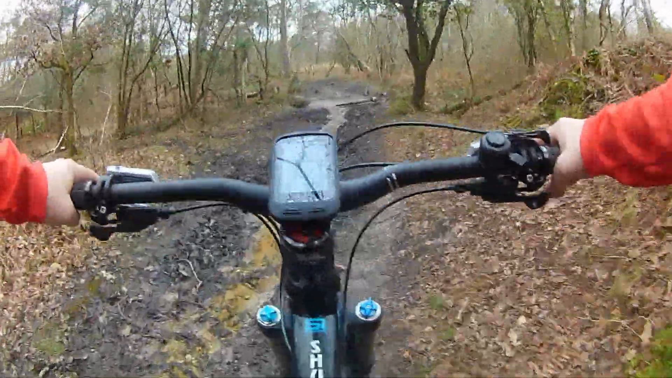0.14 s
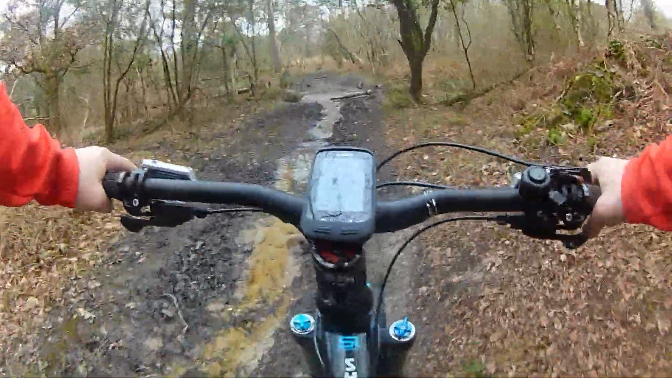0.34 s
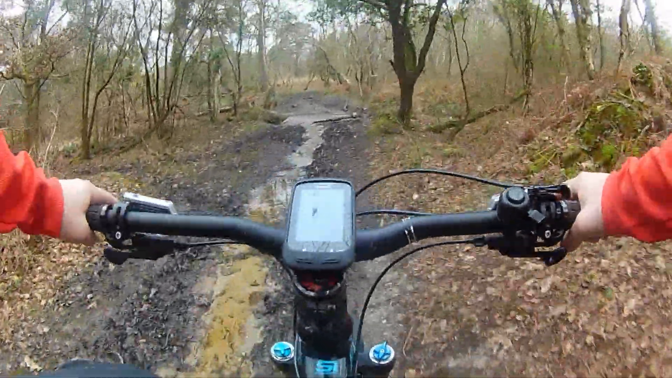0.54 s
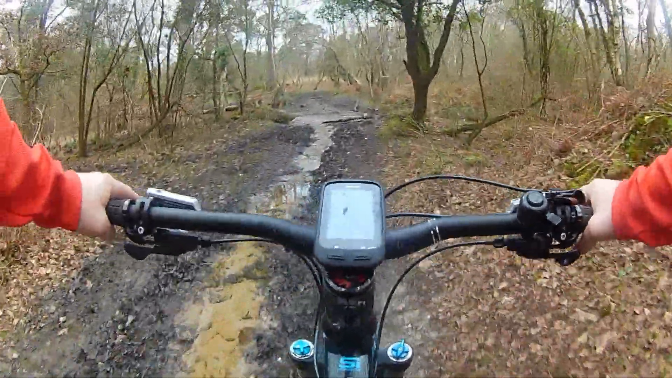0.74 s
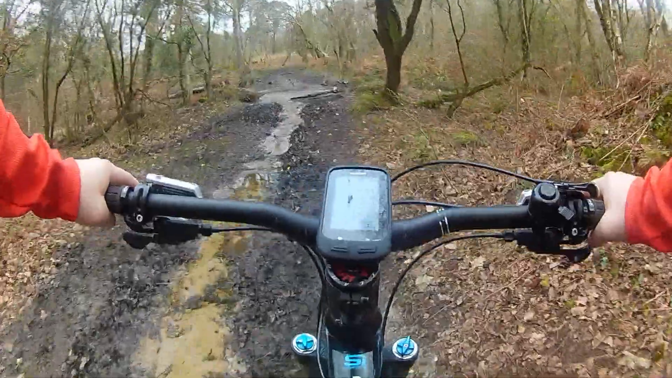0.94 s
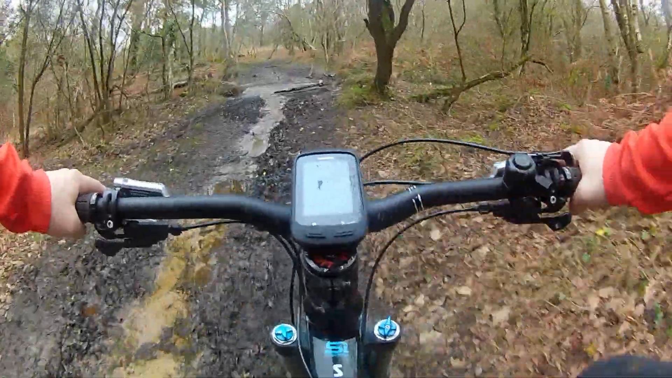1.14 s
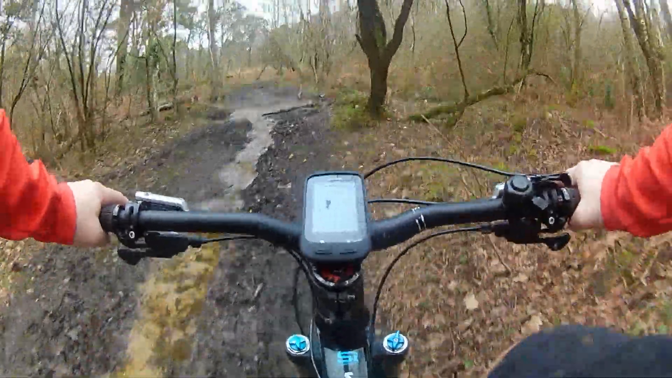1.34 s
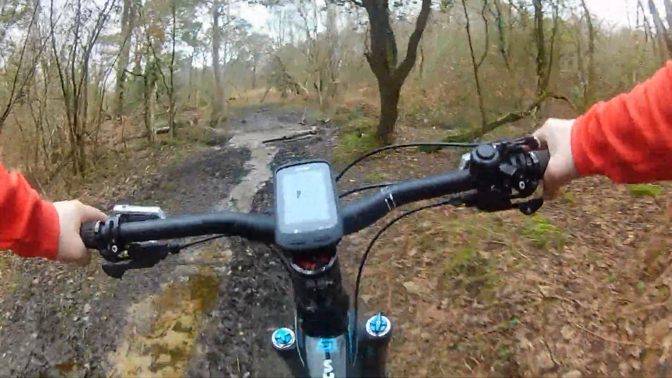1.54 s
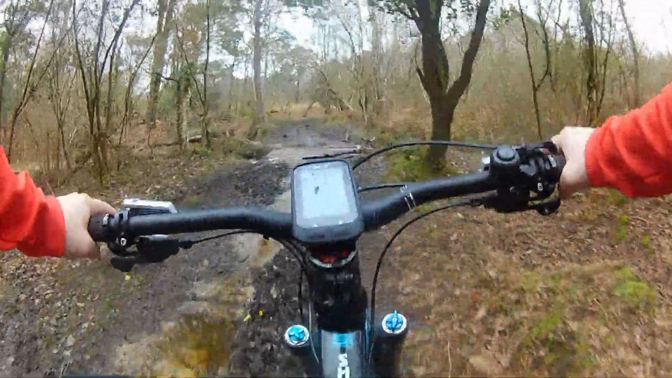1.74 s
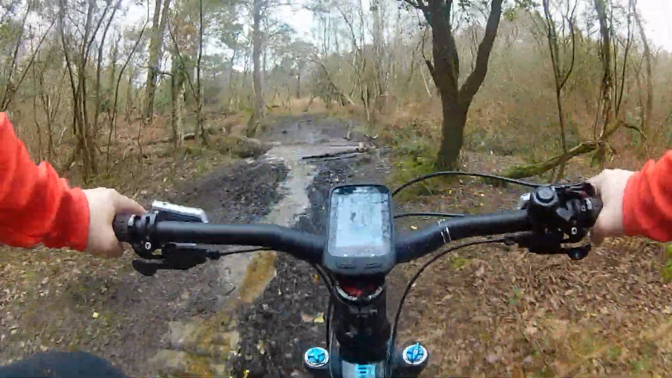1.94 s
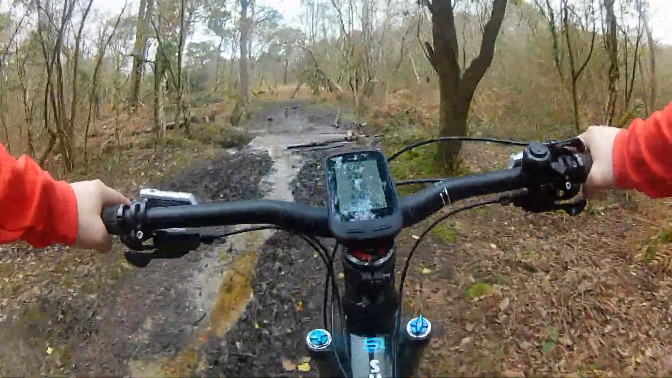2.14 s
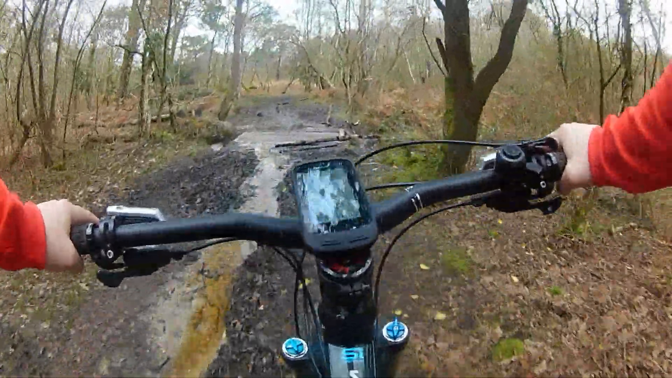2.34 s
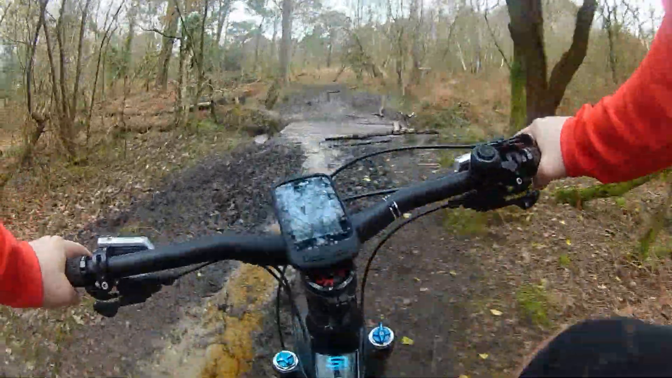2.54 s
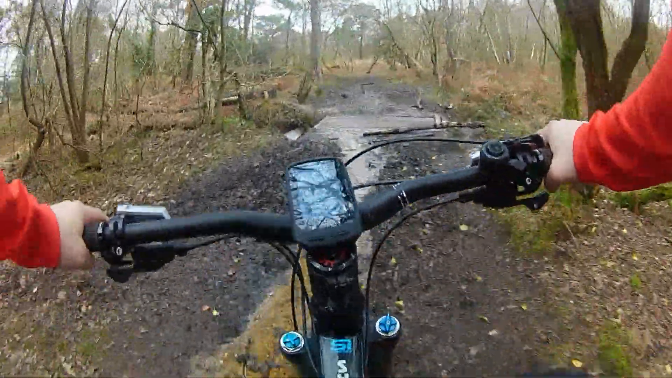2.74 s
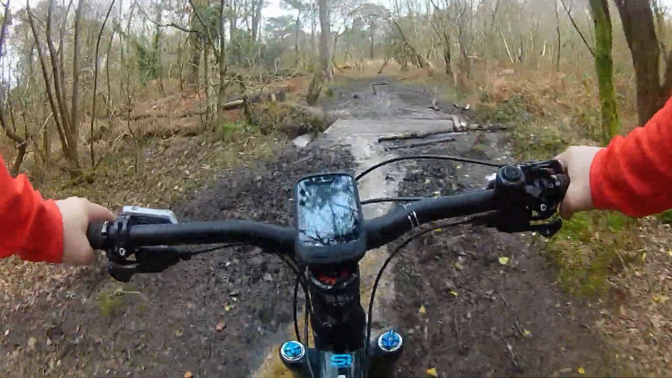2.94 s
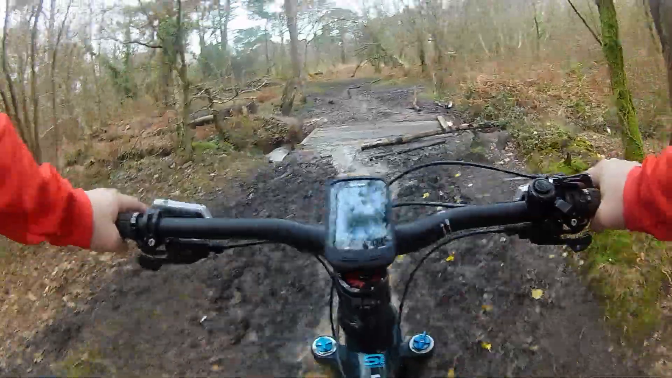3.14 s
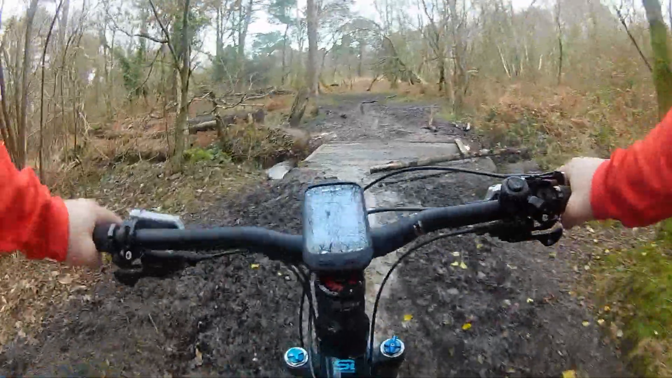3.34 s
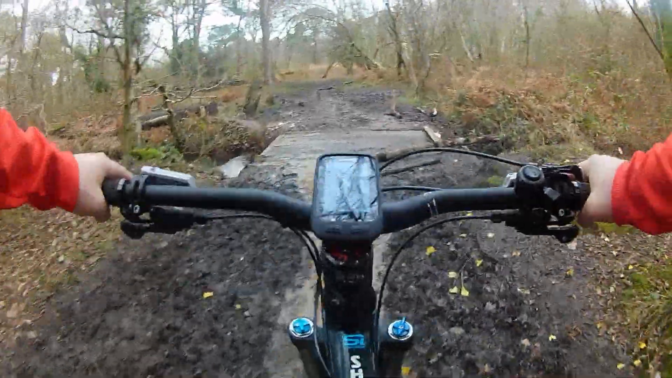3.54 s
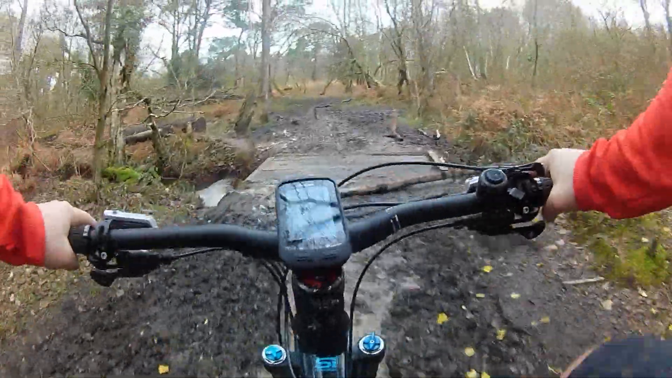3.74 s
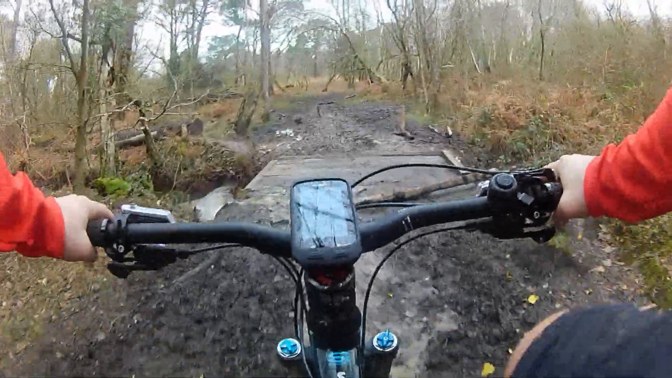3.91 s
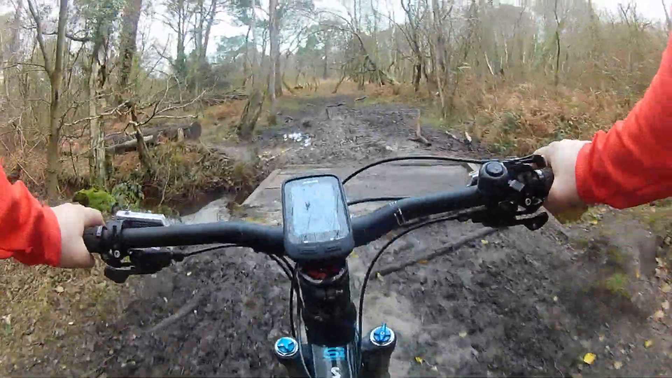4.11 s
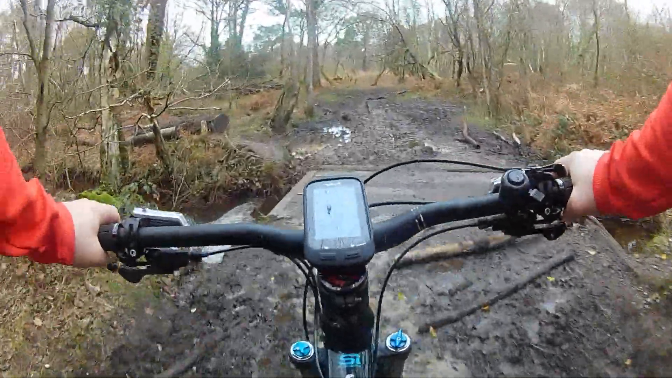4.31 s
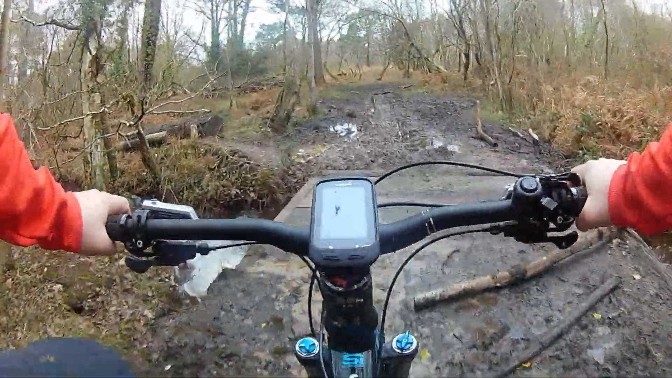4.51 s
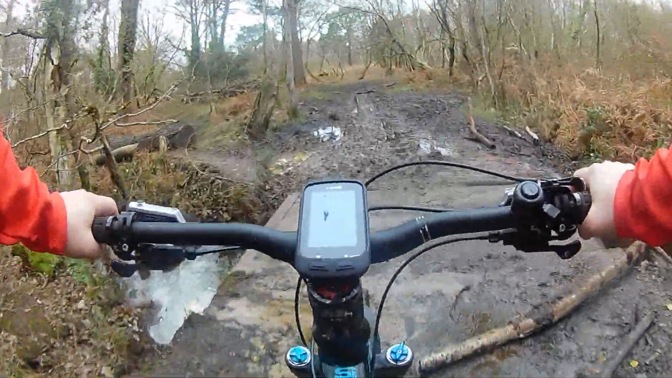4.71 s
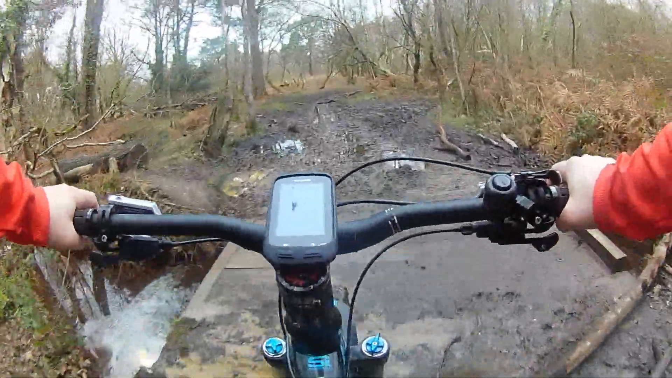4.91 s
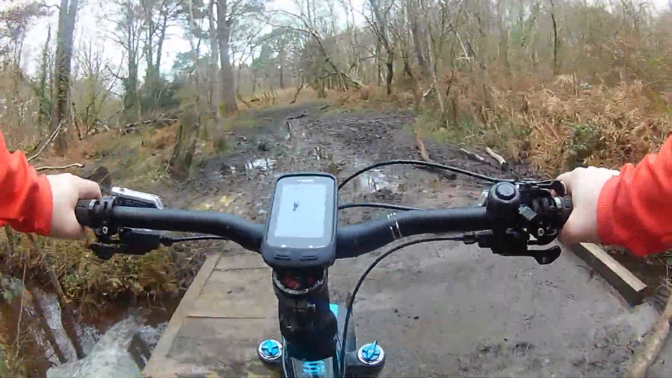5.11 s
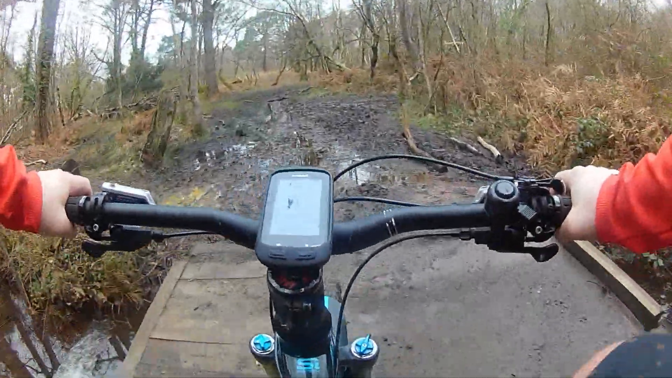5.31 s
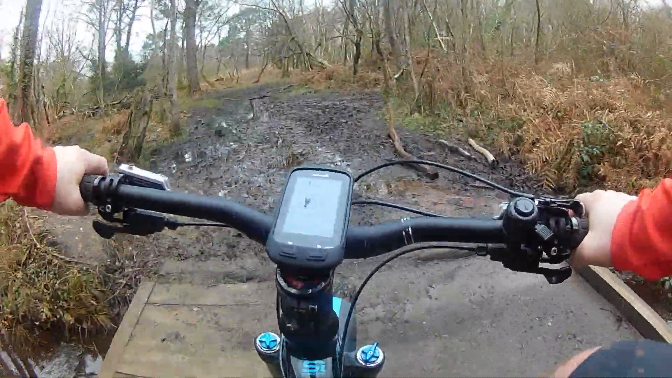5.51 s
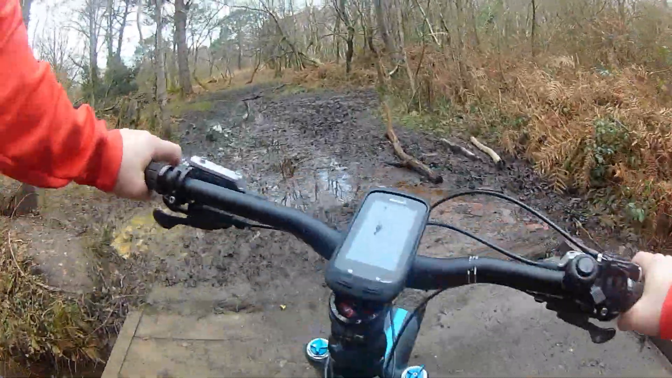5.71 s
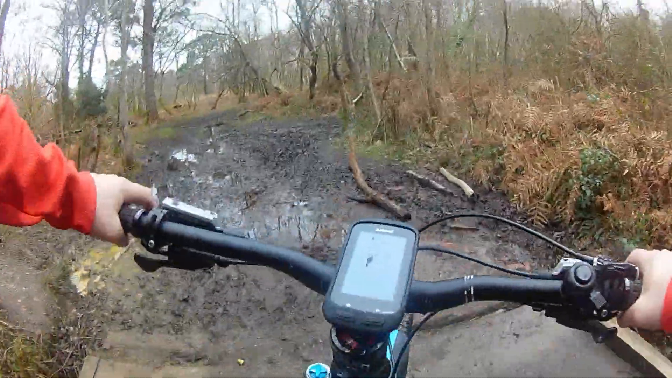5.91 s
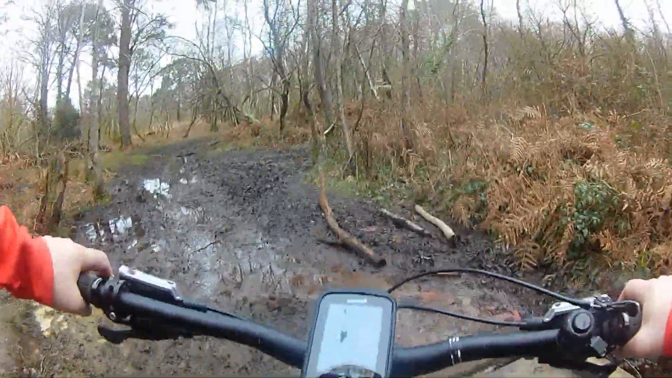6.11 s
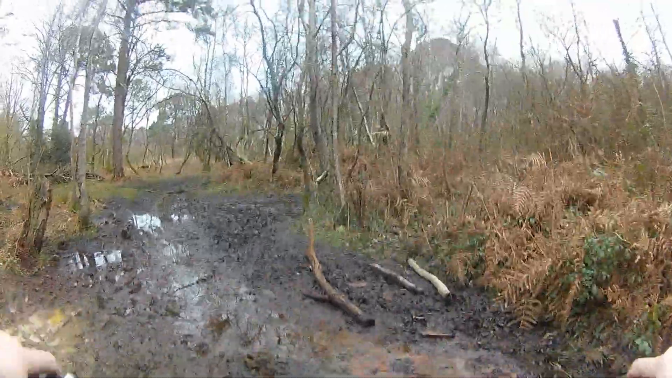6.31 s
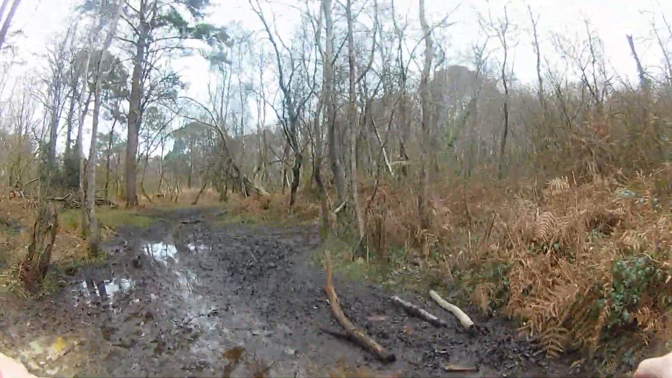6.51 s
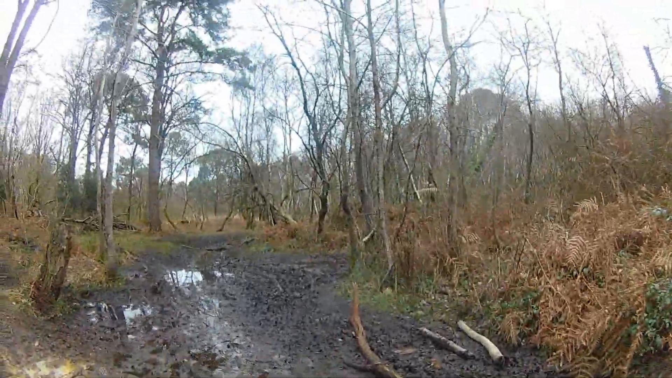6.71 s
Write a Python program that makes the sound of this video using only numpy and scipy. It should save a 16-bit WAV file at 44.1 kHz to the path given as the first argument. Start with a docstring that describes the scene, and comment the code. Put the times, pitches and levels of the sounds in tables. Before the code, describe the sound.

A mountain bike rolls along a wet woodland trail, heard close from a muffled, cased camera on the rider's chest. Tyres hiss and crackle softly, then bite harder into mud, grit and leaves with pops, squirts and snapping twigs. The crackle eases on a plank bridge, where the wheel bangs and the bike briefly clatters. Afterwards only a smooth, faint wet hiss remains, with no echo.

```python
"""A wet woodland trail: a mountain bike rolls by mud, grit and leaves, heard from a cased camera on the
rider's chest. Shaped noise makes the tyre hiss, ground drumming and spray; showers of tiny damped pops
make crackle, mud spurts and chain chatter. Damped tones make snaps and knocks, and clicks break twigs.
On a plank bridge the wheel bangs and the bike clatters. Resonances whirr in the tread and ping in the
spokes, a brake squeaks and the electronics whine. The case muffles bass and treble."""
import sys
import numpy as np
from scipy import signal
from scipy.fft import rfft, irfft, next_fast_len
from scipy.io import wavfile
from scipy.ndimage import map_coordinates

SR = 44100
rng = np.random.default_rng(int(sys.argv[2]) if len(sys.argv) > 2 else 0)


def inscribe(sig):
    """Save sig as 16-bit PCM at rate SR to the path in sys.argv[1].

    A 1-D sig is mono; a 2-D sig holds one channel per row.
    Samples are clipped to [-1, 1] before scaling.
    """
    pcm = np.round(np.clip(np.atleast_2d(sig).T, -1, 1) * 32767)
    wavfile.write(sys.argv[1], SR, pcm.astype(np.int16))


N = 302526  # samples

# what the case lets through to the microphone: frequency_hz, gain_db
CASE_RESPONSE = [(30, -44.5), (150, -27), (400, -9.5), (900, 2.5), (2800, 3), (4200, -4.5), (5200, -18.5),
                 (6100, -42), (7000, -54), (8200, -56.5), (10000, -33.5), (15000, -43)]
# bite at the edge of smooth ground, dB: hiss, crackle, drumming and spray are set from here
SMOOTH_DB = -55.5


def amp(db):
    """Decibels to gain."""
    return 10 ** (np.asarray(db) / 20)


def unit(x):
    """Scale to rms 1."""
    return x / np.sqrt(np.mean(x ** 2) + 1e-20)


def wobble(rate):
    """A smooth random curve through normal random knots, rate knots a second."""
    knots = rng.standard_normal(int(N * rate / SR) + 4)
    return map_coordinates(knots, [np.arange(N) * rate / SR])


def swells(rows):
    """Sum of smooth bell-shaped bumps from rows (s, height, half length s)."""
    t = np.arange(N) / SR
    return sum(height * np.exp(-((t - s) / width) ** 2 / 2) for s, height, width in rows)


def colour(x, points):
    """Causal minimum-phase filter with the gain of the (Hz, dB) points."""
    m = 2 * next_fast_len(len(x) // 2 + 2048)
    hz, db = np.transpose(points)
    gain = amp(np.interp(np.log(np.fft.rfftfreq(m, 1 / SR) + 1), np.log(hz), db))
    # folding the cepstrum onto positive time gives the causal phase
    cepstrum = irfft(np.log(np.maximum(gain, 1e-6)), m)
    cepstrum[1:m // 2] *= 2
    cepstrum[m // 2 + 1:] = 0
    response = np.exp(rfft(cepstrum))
    return irfft(rfft(x, m) * response, m)[:len(x)]


def noise(points):
    """Coloured noise of rms 1."""
    return unit(colour(rng.standard_normal(N), points))


def fade(t, t60):
    """Exponential decay, 60 dB in t60 seconds."""
    return np.exp(-np.log(1000) * t / t60)


def add(track, s, sound):
    """Mix a sound into the track at time s."""
    part = track[round(s * SR):][:len(sound)]
    part += sound[:len(part)]


def grains(rate, spread_db, centre_hz, scatter, cycles, size=N):
    """Tiny damped pops of random pitch and strength, rate a second, at rms 1."""
    chance, draw = rng.random(size), rng.standard_normal((size, 4))
    start = np.flatnonzero(chance < rate / SR)
    draw = draw[start]
    hz = np.clip(centre_hz * np.exp(scatter * draw[:, :1]), 400, 6000)
    strength = amp(spread_db * np.minimum(draw[:, 1:2], 2)) * np.sign(draw[:, 2:3])
    life = cycles * np.exp(draw[:, 3:] / 2) / hz
    k = np.arange(SR // 50)
    attack = 1 - np.exp(-hz * k / SR)
    pops = strength * np.sin(2 * np.pi * hz * k / SR) * fade(k / SR, life) * attack
    pops = pops / np.sqrt(life)  # longer pops start weaker
    return unit(np.bincount((start[:, None] + k).ravel(), pops.ravel(), size)[:size])


def resonance(hz, width_hz, drift):
    """Noise ringing in one resonance whose pitch drifts by the given share, at rms 1."""
    pole = np.exp(-np.pi * width_hz / SR)
    swell = signal.lfilter([1], np.poly([pole, pole]), rng.standard_normal((2, N)))
    turn = 2 * np.pi * np.cumsum(hz * (1 + drift)) / SR
    return unit(swell[0] * np.cos(turn) + swell[1] * np.sin(turn))


def tyres(bite_db):
    """Tread peeling from wet mud hisses; grit and leaves under it crackle in clumps."""
    # spectra of the hiss and of the fine crackle: frequency_hz, level_db
    rolling_spectrum = [(200, -48), (350, -28), (500, -16.5), (640, -11), (830, -2), (1050, -0.5),
                        (1400, 1.5), (1800, -3), (2300, -6.5), (3000, -12.5), (3600, -17), (4200, -23),
                        (5000, -37.5), (6200, -60.5)]
    crackle_spectrum = [(300, -47), (600, -27), (900, -11.5), (1250, 1), (1800, 4), (2500, -3.5),
                        (3300, -2.5), (3750, -10.5), (4150, -8), (4800, -16.5), (5500, -24.5),
                        (6200, -64.5), (10000, -86.5)]
    # the wet deck and the mud beyond it hiss louder: time_s, gain_db, half_length_s
    wet_patch = [(5.9, 3, 0.5)]
    # clumps of leaves or grit being crushed: time_s, crackle_gain_db, further_tick_gain_db, half_length_s
    crunches = [(0.273, 0, 11, 0.021), (1.223, 2, 1.5, .04), (2.29, 2.5, 3, 0.17), (2.699, 1, 9.5, 0.023),
                (3.223, 3.5, 2, 0.078), (3.795, -2, 6, 0.14), (4.233, 2, 0, 0.063), (4.88, 2, 8.5, 0.024)]
    hiss_db, hiss_growth = -56.5, 0.13  # at the edge of smooth ground; dB per dB of bite
    smooth_fall = 1  # further dB of crackle lost per dB of bite on smooth ground

    hiss_level_db = hiss_db + hiss_growth * (bite_db - SMOOTH_DB) + swells(wet_patch)
    hiss = amp(hiss_level_db + 0.53 * wobble(40)) * noise(rolling_spectrum)

    # countless tiny fractures, with wet pops and small gritty ticks among them
    fractures = rng.standard_normal(N) * (rng.random(N) < 1300 / SR)
    fine = unit(colour(fractures, crackle_spectrum))
    pops = grains(rate=520, spread_db=0.0, centre_hz=1685, scatter=0.234, cycles=41.0)
    pops = unit(colour(pops, CASE_RESPONSE))
    ticks = grains(rate=300, spread_db=1, centre_hz=3650, scatter=0.2, cycles=25)
    ticks = unit(colour(ticks, CASE_RESPONSE))
    # coarse grit cracks in fewer, sharper clicks
    coarse = grains(rate=170, spread_db=3, centre_hz=2100, scatter=0.3, cycles=6)
    coarse = unit(colour(coarse, CASE_RESPONSE))

    # on smooth wet ground the crackle falls away faster than the hiss
    crunch_db = swells([(s, db, width) for s, db, _, width in crunches])
    grit_db = swells([(s, db, width) for s, _, db, width in crunches])
    crackle_db = bite_db + smooth_fall * np.minimum(bite_db - SMOOTH_DB, 0) + crunch_db
    clumps = amp(crackle_db + 1.6 * np.tanh(wobble(70)))
    fragments = amp(-2.0) * (fine + coarse) / np.sqrt(2)
    crackle = fragments + amp(-1.8) * pops + amp(grit_db - 10.5) * ticks
    return hiss + clumps * crackle


def ground(bite_db):
    """Uneven ground drums softly through the tyres, more where they bite harder and over ruts."""
    # spectrum of the drumming: frequency_hz, level_db
    drumming_spectrum = [(60, -31), (150, -22), (280, -8), (450, 1), (700, -1), (1200, -9), (2500, -49)]
    # ruts and buried roots that drum louder: time_s, gain_db, half_length_s
    ruts = [(1.22, 5.5, 0.14), (2.33, 10, 0.085), (3.3, 4.5, 0.16), (3.54, 8.5, 0.022), (3.67, 6.5, 0.064)]
    drum_db, drum_growth = -80.5, 0.89  # at the edge of smooth ground; dB per dB of bite
    level_db = drum_db + drum_growth * (bite_db - SMOOTH_DB) + swells(ruts)
    flutter_db = 3.5 * np.tanh(wobble(35)) + 1.8 * wobble(130)
    return amp(level_db + flutter_db) * noise(drumming_spectrum)


def spray(bite_db):
    """Fine wet spray adds a trace of speckled treble that swells with the tyres' bite."""
    # spectrum of the spray: frequency_hz, level_db
    spray_spectrum = [(4000, -43.5), (6100, -6.5), (6800, -1), (8100, -16.5), (9000, -2), (10000, 2.5),
                      (12000, -2), (15500, -5.5)]
    spray_db, spray_growth = -89, 0.84  # at the edge of smooth ground; dB per dB of bite
    speckle_db = 1.8 * wobble(30) + 2.5 * wobble(300)
    level_db = spray_db + spray_growth * (bite_db - SMOOTH_DB) + speckle_db
    return amp(level_db) * noise(spray_spectrum)


def self_noise():
    """The microphone's own noise is a faint, steady, coloured hiss."""
    # spectrum of the noise floor: frequency_hz, level_db
    floor_spectrum = [(20, 7), (45, 5.5), (59, 17.5), (75, 14), (200, 14.5), (1000, 19.5), (5000, -0.5),
                      (6100, -30), (6800, -11), (8100, -14.5), (10000, -3.5), (13000, 4), (15700, -1)]
    return amp(-80.0) * noise(floor_spectrum)


def whine():
    """A thin, steady whine from the electronics, roughened by regular slips of its cycle."""
    whine_hz, slips_per_s, slip_turns = 13698, 84.4, 0.4775
    t = np.arange(N) / SR
    turns = whine_hz * t + slip_turns * np.floor(slips_per_s * t)
    return amp(-84.0) * unit(np.sin(2 * np.pi * turns))


def snaps():
    """Wet clods and stones pop from under the tyres, each swelling and dying at its own pitch with crumbs."""
    # pops: time_s, level_db (rms over the first 10 ms), pitch_hz, crumbs_db (relative to the pop)
    clods = [(0.145, -57.5, 3550, -3), (0.957, -53, 1370, -12), (0.989, -52.5, 1400, 3),
             (1.084, -44, 1556, -14), (1.102, -51, 2070, -9), (1.112, -50.5, 1760, -8),
             (1.201, -42, 1624, -11), (1.218, -53, 2000, -4), (1.406, -46, 1670, -3),
             (1.426, -49, 1770, -12), (1.447, -48.5, 2900, -2), (1.503, -46, 1383, -9),
             (1.5068, -37.5, 1838, -22), (1.572, -50, 1280, -8), (2.877, -44.5, 1610, -9),
             (2.933, -50, 1240, -2), (3.062, -53, 2000, -14), (3.134, -47, 2150, -10),
             (3.495, -48.5, 1730, -6), (3.567, -53, 2030, -16), (3.63, -48, 3450, -3),
             (3.687, -48.5, 1740, -5), (3.745, -48, 1630, 1), (3.778, -45.5, 2220, -16),
             (3.833, -50.5, 1850, -13), (3.972, -42, 1695, -17), (4.022, -51, 1200, -14),
             (4.162, -48, 1700, -10), (4.208, -46.5, 1940, -18), (4.303, -44, 1940, -21),
             (4.408, -47.5, 2220, -11), (4.457, -47, 1570, -19), (4.537, -46, 2150, -18),
             (4.61, -43, 1846, -12), (4.656, -45, 2570, 2), (4.765, -53, 1830, -1), (4.861, -44, 1390, -9),
             (5.797, -56, 1680, -15), (6.36, -55, 1380, -4)]
    # spectrum of the crumbs: frequency_hz, gain_db
    crumb_spectrum = [(30, -64), (200, -40), (600, -15.5), (1100, 3), (2000, 8), (3100, -4), (4200, -3.5),
                      (5200, -21), (6100, -49), (8200, -59), (10000, -41)]
    track, t = np.zeros(N), np.arange(SR // 16) / SR
    head, rise = t < 0.01, 1 - np.exp(-t / 0.004)
    for s, db, hz, crumbs_db in clods:
        pop = np.sin(2 * np.pi * hz * t) * fade(t, 0.0082) * rise
        # a weak, longer tone near the same pitch follows a moment later
        lag = np.maximum(t - rng.uniform(0.00128, 0.00384), 0)
        tail_hz = hz * rng.uniform(0.825, 1.16)
        pop += 0.07 * np.sin(2 * np.pi * tail_hz * lag) * fade(lag, 0.066)
        scatter = rng.standard_normal(len(t)) * (fade(t, 0.028) + 0.085 * fade(t, 0.057))
        crumbs = colour(scatter, crumb_spectrum)
        snap = unit(colour(pop, CASE_RESPONSE)) + amp(crumbs_db) * unit(crumbs)
        add(track, s, amp(db) * snap / np.std(snap[head]))
    return track


def whirr():
    """Air pumped out of the tread sounds two wandering resonances about an octave apart."""
    # smooth wet stretches: start_s, end_s, lower_resonance_db, upper_resonance_db
    stretches = [(0.345, 0.676, -61, -70), (0.86, 0.99, -64, -90), (5.06, 5.488, -59.5, -81),
                 (5.81, 6.305, -62, -66), (6.61, 6.86, -77, -78)]
    fade_s, wander = 0.12, 0.01006  # fade outside each stretch; pitch wander as a share
    t = np.arange(N) / SR
    start, end, lower_db, upper_db = np.transpose(stretches)[:, :, None]
    contact = np.clip(1 + np.minimum(t - start, end - t) / fade_s, 0, 1)
    lower, upper = np.sum(contact * amp([lower_db, upper_db]), axis=1)
    # both pitches wander together as the tread loads and unloads
    drift = wander * wobble(6)
    low_tone = resonance(hz=1390, width_hz=225, drift=drift)
    high_tone = resonance(hz=2770, width_hz=370, drift=drift)
    return amp(2.0 * wobble(10)) * (lower * low_tone + upper * high_tone)


def twigs():
    """A twig breaks with one dry click, and its fibres tear in a quickly fading run of smaller ones."""
    # breaking twigs: time_s, level_db (rms over the first 10 ms), centre_hz
    breaks = [(0.28, -54, 3100), (1.488, -42.5, 2600), (1.922, -49, 1900), (2.678, -48, 2600),
              (3.008, -48.5, 2300), (3.0824, -36.5, 1950), (3.3057, -46, 1900), (3.8687, -45, 2900),
              (4.0855, -42, 2400)]
    # colour of breaking wood: frequency_hz, gain_db
    wood_spectrum = [(30, -66), (200, -38), (500, -15.5), (1000, 3), (2000, 4.5), (3000, 0.5), (4000, -6),
                     (5000, -24), (6100, -53), (8200, -54), (10000, -39), (15000, -44)]
    splinters_per_s, splinter_t60_s, break_db = 3300, 0.043, 5.5
    track, t = np.zeros(N), np.arange(SR // 16) / SR
    for s, db, hz in breaks:
        splinters = rng.choice([-1, 1], len(t)) * (rng.random(len(t)) < splinters_per_s / SR)
        clicks = splinters * fade(t, splinter_t60_s)
        clicks[0] = amp(break_db)
        crack = colour(clicks, wood_spectrum)
        crack = colour(crack, [(hz / 2, -5), (hz, 0), (hz * 2, -5)])
        add(track, s, amp(db) * crack / np.std(crack[t < 0.01]))
    return track


def spurts():
    """Mud squirts from under the tread: a patter of bursting bubbles starts sharply, holds and dies."""
    # squirts: start_s, length_s, level_db (rms over that length), pitch_hz
    squirts = [(1.09, 0.019, -59, 1650), (1.186, 0.031, -52.5, 2230), (1.243, 0.018, -56, 1920),
               (1.409, 0.03, -48, 1780), (1.52, 0.036, -49.5, 2020), (1.562, 0.014, -59, 2720),
               (1.641, 0.01, -51, 1660), (1.826, 0.037, -62.5, 3270), (2.693, 0.014, -52, 3040),
               (2.848, 0.029, -53, 1890), (2.962, 0.046, -53, 1920), (3.112, 0.025, -52, 2660),
               (3.172, 0.037, -53, 2240), (3.522, 0.025, -51.5, 1590), (3.685, 0.013, -51.5, 1780),
               (4.129, 0.053, -51, 1800), (4.215, 0.041, -53.5, 1990), (4.337, 0.069, -52.5, 1630),
               (4.571, 0.032, -44.5, 1840)]
    # colour of squirting mud: frequency_hz, gain_db
    mud_spectrum = [(200, -30), (600, -28.5), (1100, 2.5), (2800, 1), (4200, 0.5), (5200, -11.5),
                    (6100, -39), (8200, -51), (10000, -30), (15000, -32)]
    rise_s, t60_s = 0.0024, 0.045
    track, t = np.zeros(N), np.arange(SR // 8) / SR
    for s, length, db, hz in squirts:
        flow = np.minimum(t / rise_s, 1) * fade(np.maximum(t - length, 0), t60_s)
        patter = grains(rate=1300, spread_db=2.5, centre_hz=hz, scatter=0.359, cycles=17, size=len(t))
        spurt = flow * colour(patter, mud_spectrum)
        add(track, s, amp(db) * spurt / np.std(spurt[t < length]))
    return track


def knocks():
    """Wheels hit roots and planks and the bike rattles: dead thumps with cracks and a brief ring."""
    # blows: time_s, level_db (rms over the first 10 ms), pitch_hz, crack_db, crack_upper_edge_hz, ring_db
    blows = [(3.534, -52.5, 560, -3, 1800, -26), (3.7815, -46, 560, 2, 1600, -28),
             (5.5478, -38.5, 2820, -8, 12000, -34), (5.5492, -30, 2130, -10.5, 12000, -32.5),
             (5.5512, -40, 1100, -23, 3000, -27), (5.5712, -43, 1080, -23, 2000, -25.5),
             (5.577, -40.5, 1900, -18, 3000, -29), (5.5808, -31.5, 1310, -15, 9000, -31),
             (5.589, -42.5, 1060, -19, 2500, -27), (5.5955, -45, 1700, -24, 3000, -36),
             (5.6042, -35, 864, -16, 1500, -23.5), (5.6078, -50, 845, -19, 2000, -15),
             (5.6107, -45, 1960, -10, 5000, -24), (5.6415, -44.5, 2020, -16, 5000, -29),
             (5.6465, -49, 1900, -19, 3000, -25)]
    # ringing of frame and deck: frequency_hz, level_db, t60_s
    frame_modes = [(276, -1.5, 0.04), (321, -8, 0.057), (597, -0.5, 0.037), (713, 1, 0.069),
                   (1104, 9, 0.041), (1330, 4, 0.027), (1594, -0.5, 0.085), (1844, 2, 0.081),
                   (2250, -8, 0.036), (2655, -9, 0.058), (3500, -11, 0.035), (4340, -14, 0.073)]
    # colour of the crack at each contact: frequency_hz, gain_db
    crack_spectrum = [(200, -6), (500, -4.5), (900, 0), (3000, 7.5), (4400, -5), (5600, -7), (7000, 3),
                      (9000, -1), (13000, -3)]
    track, t = np.zeros(N), np.arange(SR // 8) / SR
    mode_hz, mode_db, mode_t60 = np.transpose(frame_modes)[:, :, None]
    for s, db, hz, crack_db, edge_hz, ring_db in blows:
        thump = np.sin(2 * np.pi * hz * t) * fade(t, 7 / hz) * (1 - np.exp(-2 * hz * t))
        crack = amp(crack_db) * rng.standard_normal(len(t)) * (fade(t, 0.019) + 0.05 * fade(t, 0.09))
        crack = colour(crack, [(edge_hz, 0), (2 * edge_hz, -18)])
        # each blow excites the modes at slightly new strengths
        strength = amp(mode_db + rng.normal(0, 0.78, mode_db.shape))
        strength = strength * rng.choice([-1, 1], mode_db.shape)
        ring = np.sum(strength * np.sin(2 * np.pi * mode_hz * t) * fade(t, mode_t60), axis=0)
        knock = thump + colour(crack, crack_spectrum) + amp(ring_db) * ring
        knock = colour(knock, CASE_RESPONSE)
        add(track, s, amp(db) * knock / np.std(knock[t < 0.01]))
    return track


def pings():
    """Flung grit grazing a spoke gives a brief, rough, high, faint ring."""
    # grazes: time_s, level_db (rms at the peak)
    grazes = [(3.748, -64), (5.718, -70), (5.88, -73), (6.006, -70)]
    half_length_s = 0.0052
    touch = swells([(s, amp(db), half_length_s) for s, db in grazes])
    return touch * resonance(hz=4220, width_hz=140, drift=np.zeros(N))


def brake():
    """The wet disc brushes a pad and sings very high for a moment."""
    # thin squeaks: time_s, level_db (rms at the peak), half_length_s
    squeaks = [(4.292, -81, .014), (4.398, -86, .018), (4.517, -66, 0.0091)]
    touch = swells([(s, amp(db), width) for s, db, width in squeaks])
    pitch_hz = 15200 + 80 * wobble(250)
    return touch * unit(np.sin(2 * np.pi * np.cumsum(pitch_hz) / SR))


def chatter():
    """Chain and cables, shaken by the blow on the planks, patter against the frame."""
    # shakes: time_s, level_db (rms at the peak), half_length_s
    shakes = [(5.574, -46, 0.0052), (5.584, -42, 0.0026), (5.596, -44, 0.0031)]
    # colour of the chain: frequency_hz, gain_db
    chain_spectrum = [(200, -49), (600, -22), (1000, -8.5), (1700, -4), (2700, -1), (3100, -8), (3600, 0),
                      (4000, -13), (4500, -13), (5500, -34), (7000, -45.5)]
    shake = swells([(s, amp(db), width) for s, db, width in shakes])
    patter = grains(rate=2600, spread_db=-0.5, centre_hz=2760, scatter=0.35, cycles=22)
    return shake * unit(colour(patter, chain_spectrum))


def scene():
    """Everything rides along with the microphone; the open wood gives no echo."""
    # how hard the tyres bite into grit and leaves: time_s, bite_db
    bite_points = [(0.0, -57.5), (0.99, -59.5), (1.07, -53.5), (1.25, -53), (1.37, -54), (1.53, -55),
                   (1.93, -56.5), (2.03, -59.5), (2.6, -57), (2.8, -53), (3.13, -53.5), (3.38, -54.5),
                   (3.57, -52), (3.69, -51.5), (4.05, -51.5), (4.4, -50.5), (4.8, -54), (5.1, -58),
                   (5.35, -60.5), (6.04, -63.5), (6.51, -67), (6.86, -66)]
    times, levels_db = np.transpose(bite_points)
    bite_db = np.interp(np.arange(N) / SR, times, levels_db)
    rolling = tyres(bite_db) + ground(bite_db) + spray(bite_db) + whirr()
    trail = snaps() + twigs() + spurts()
    bike = knocks() + pings() + brake() + chatter()
    return (rolling + trail + bike + self_noise())[None]


def record(dry):
    """The camera adds its whine and keeps nothing above its band limit."""
    top_hz = 15750
    m = next_fast_len(N + SR // 2)
    kept = np.fft.rfftfreq(m, 1 / SR) < top_hz
    return irfft(rfft(dry + whine(), m) * kept, m)[:, :N]


dry = scene()
out = record(dry)
inscribe(out)
```